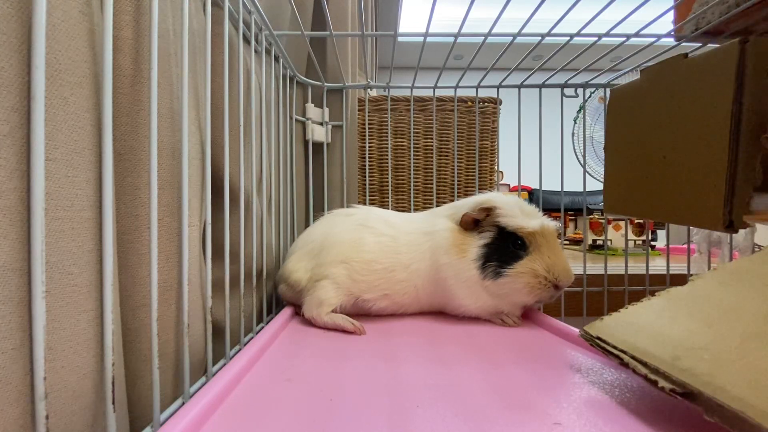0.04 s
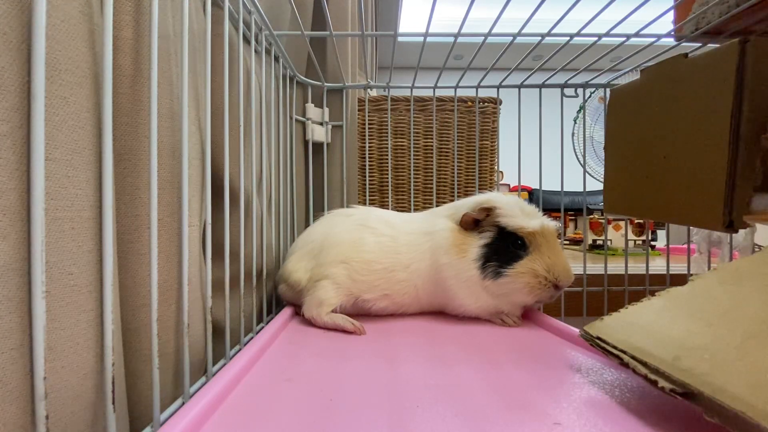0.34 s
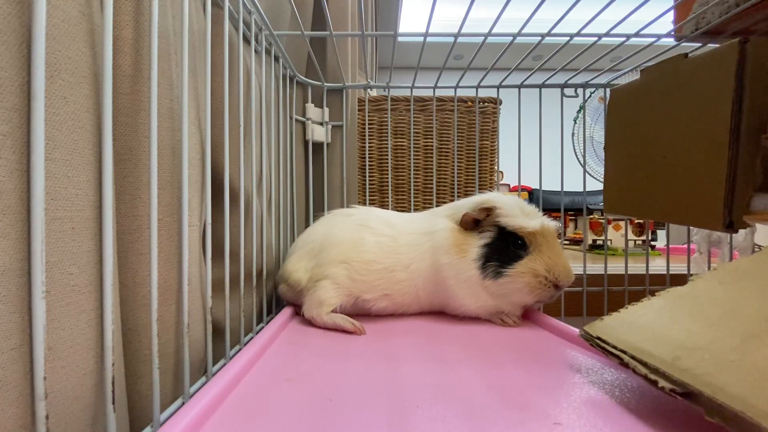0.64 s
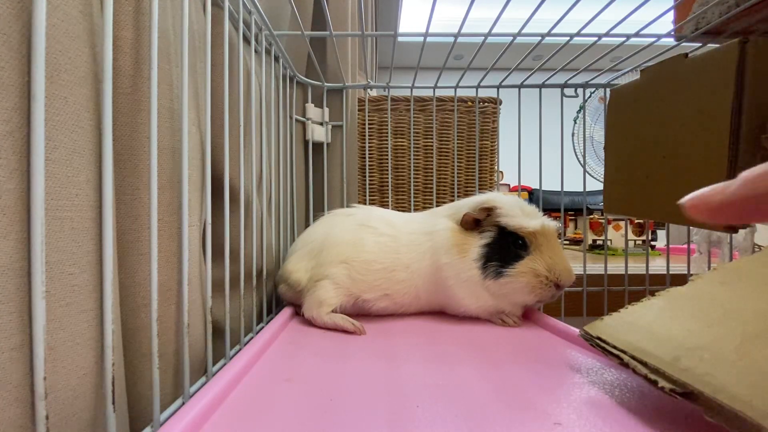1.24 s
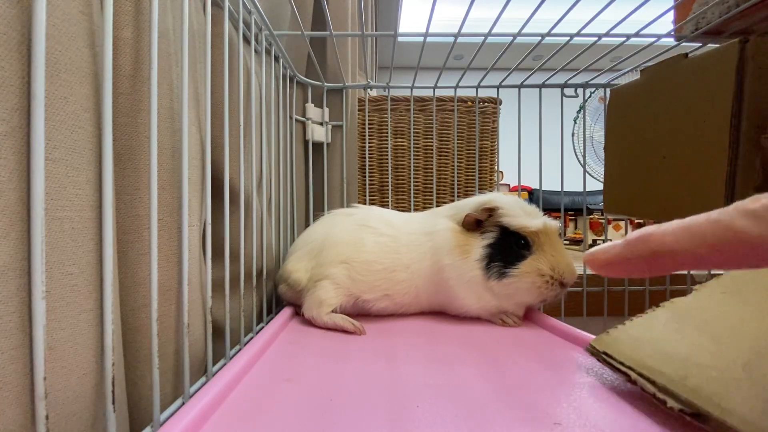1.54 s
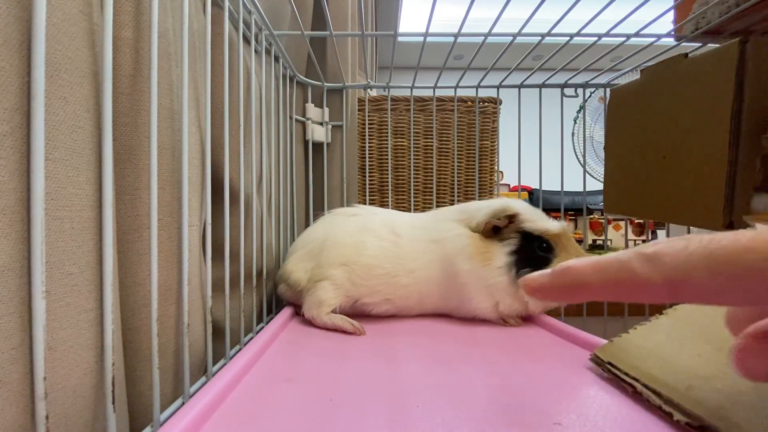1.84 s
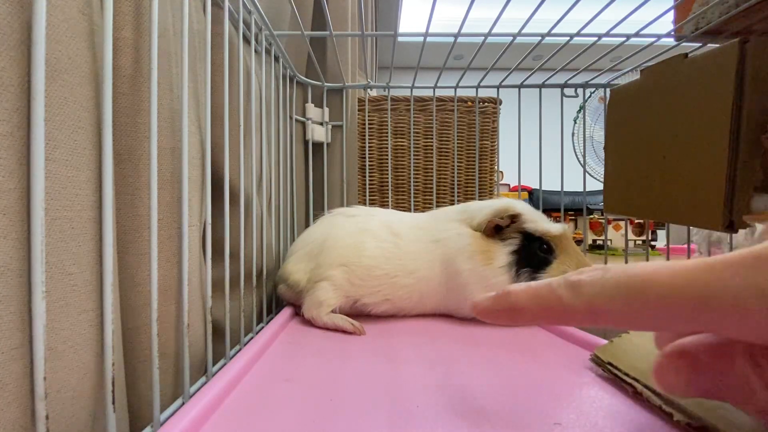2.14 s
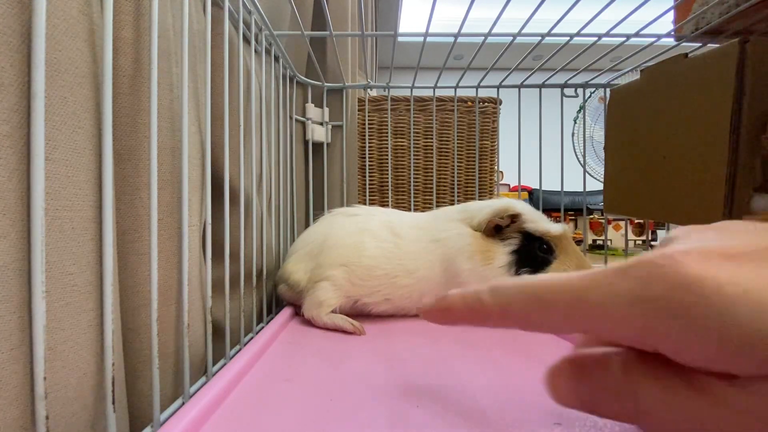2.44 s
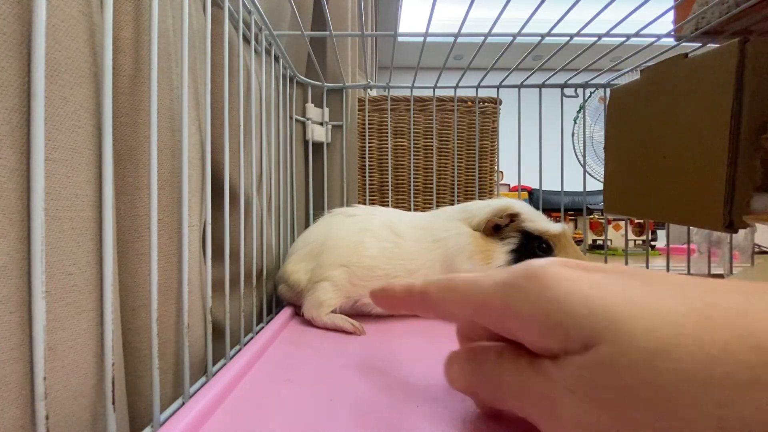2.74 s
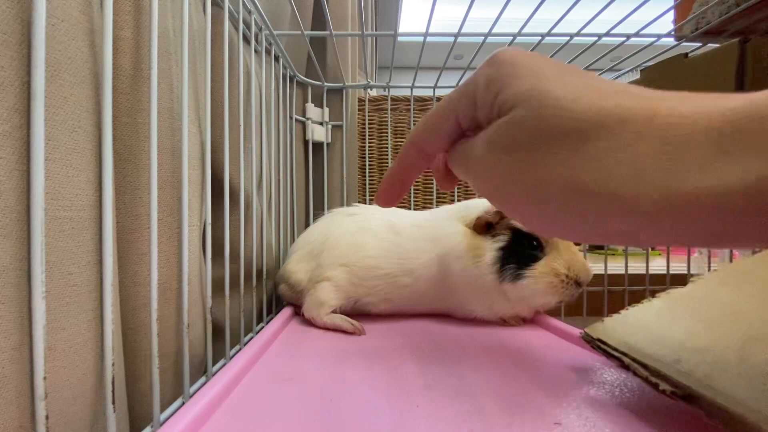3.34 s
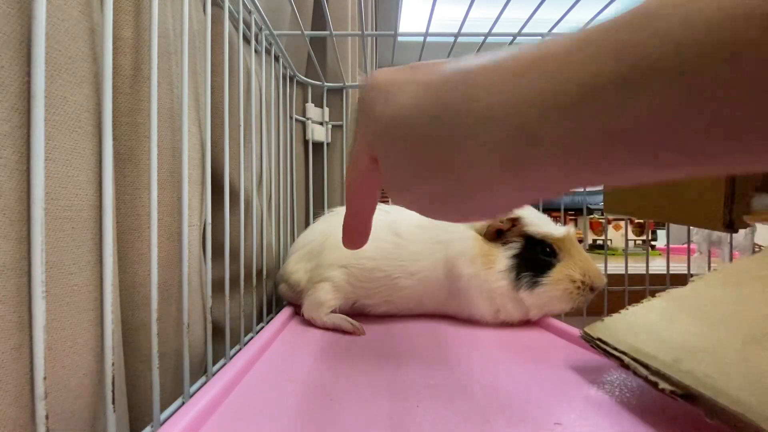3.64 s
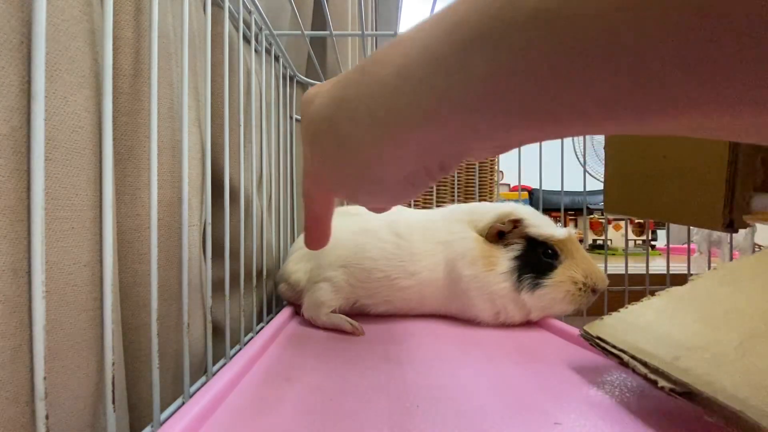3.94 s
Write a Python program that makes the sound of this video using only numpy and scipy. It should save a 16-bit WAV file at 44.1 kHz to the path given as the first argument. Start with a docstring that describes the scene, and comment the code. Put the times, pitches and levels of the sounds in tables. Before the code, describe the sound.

A guinea pig gives short, low chuts, often paired, growing louder over the first two seconds. Fur rustles under a finger from about 1.7 to 3 seconds. A wavering whine runs from 2 to 2.5 seconds, then the plastic tray thumps softly near 2.7, with a brief scratch near 2.9. High squeaks mix with more chuts until a hoarse protest at 3.8 seconds. A low room hum continues underneath.

```python
"""Short, low grumbles that flick upward: a guinea pig "chuts" in its wire cage.
As a finger strokes it, it whines, squeaks and ends on a hoarse protest. One voice makes every call:
a note and its overtones pass through a fixed throat, turning rough where the voice catches or breaks.
Fur rustles under the finger, the plastic tray is bumped, and a low hum fills the small room."""
import sys
import numpy as np
from scipy import signal
from scipy.fft import rfft, irfft
from scipy.io import wavfile
from scipy.ndimage import uniform_filter1d, map_coordinates

SR = 44100
rng = np.random.default_rng(int(sys.argv[2]) if len(sys.argv) > 2 else 0)


def unload_wav(signal):
    """Save mono or channel-first audio to the path in sys.argv[1] as 16-bit WAV at rate SR, clipped to [-1, 1]."""
    wavfile.write(
        sys.argv[1],
        SR,
        np.round(np.clip(np.atleast_2d(signal).T, -1, 1) * 32767).astype(np.int16),
    )


N = 176400
T = np.arange(N) / SR
FREQS = np.fft.rfftfreq(N, 1 / SR)
TOP_HZ = 15900


# One chut a row: start t/s, body length/s, first f/Hz, held f/Hz, last f/Hz, level/dB,
# roughness (0 clear, about 1 all rasp), flick length/s, flick f/Hz, flick level/dB
CHUT_CALLS = [(0.214, 0.046, 678, 699, 730, -47.5, 0.37, 0.0055, 730, -65),
              (0.315, 0.04, 598, 653, 769, -48.5, 0.29, 0.014, 824, -57.5),
              (0.643, 0.05, 611, 763, 741, -47.5, 0, 0.0067, 750, -66),
              (0.934, 0.049, 609, 724, 707, -45.5, 0.5, 0.025, 915, -41.5),
              (1.044, 0.045, 604, 723, 691, -45.5, 0.25, 0.025, 1043, -40),
              (1.284, 0.055, 583, 746, 621, -45, 0.39, 0.029, 986, -38),
              (1.392, 0.059, 600, 769, 682, -44.5, 0.63, 0.019, 1147, -38.5),
              (1.607, 0.055, 637, 716, 641, -42.5, 0.56, 0.019, 1367, -38),
              (1.704, 0.052, 678, 728, 860, -42.5, 1.04, 0.0175, 1590, -45.5),
              (1.903, 0.067, 679, 690, 581.6, -43, 0.65, 0.023, 2970, -46),
              (2.658, 0.075, 723, 672.4, 709, -42.5, 0.55, 0.033, 3100, -44),
              (3.169, 0.077, 715.4, 682.4, 706, -39, 0.56, 0.033, 2850, -45.5),
              (3.596, 0.075, 677.4, 705, 680, -37.5, 0.37, 0.029, 2970, -49)]

def chuts():
    """Each chut catches roughly, holds a clearer low note, breaks, and flicks upward."""
    hold_from, hold_to, flick_rise = .42, .755, .49  # shares of the body and of the flick
    calls = []
    for start, length, first_hz, held_hz, last_hz, db, rough, flick_s, flick_hz, flick_db in CHUT_CALLS:
        end = start + length
        rise_s = flick_s * flick_rise
        leap = max(np.log2(flick_hz / last_hz) - 1, 0)
        break_db = min(db, flick_db) - 7 * leap  # the voice drops out on leaps wider than an octave
        points = [(start, first_hz, db - 4.5, rough),
                  (start + length * hold_from / 2, first_hz, db, rough ** 2),
                  (start + length * hold_from, held_hz, db, .35 * rough),
                  (start + length * hold_to, (held_hz + last_hz) / 2, db, .35 * rough),
                  (start + length * (1 + hold_to) / 2, last_hz, db, rough),
                  (end, last_hz, db + 1.5, min(1.67 * rough, 1)),
                  (end + rise_s / 2, np.sqrt(last_hz * flick_hz), break_db, min(rough / 2 + leap, 1)),
                  (end + rise_s, flick_hz, flick_db, .18 + leap / 2),
                  (end + flick_s, flick_hz, flick_db, .18)]
        base_db = .65 * (-36.5 - db)  # louder chuts are pressed, which weakens the base note
        calls.append((points, base_db))
    return calls


# The path of each whine, one list each: t/s, f/Hz, level/dB
WHINE_PATHS = [
    [(2.025, 2056, -51), (2.036, 1247, -40.5), (2.058, 1291, -41.5), (2.1, 2003, -46), (2.137, 1817, -48),
     (2.206, 1894, -44), (2.24, 1644, -40), (2.254, 1815, -48), (2.286, 1912, -43), (2.3, 1673, -45.5),
     (2.368, 1974, -44.5), (2.412, 1900, -46), (2.422, 1640, -41.5), (2.455, 2200, -60.5),
     (2.482, 1882, -42), (2.52, 2650, -67)],
    [(2.8, 3060, -43), (2.82, 2716, -45.5), (2.892, 2696, -51)],
    [(2.907, 1615, -41), (2.922, 1302, -39.5), (2.936, 1654, -41), (2.982, 2010, -46), (2.994, 2604, -48.5),
     (3.036, 2953, -39), (3.059, 2910, -41)],
    [(3.279, 3134, -55), (3.294, 4065, -51), (3.308, 3190, -49.5), (3.341, 2960, -42), (3.359, 4200, -61),
     (3.371, 3030, -45), (3.412, 3310, -72)],
    [(3.479, 2770, -54), (3.488, 2640, -38.5), (3.506, 1420, -51)],
    [(3.704, 2974, -44), (3.725, 4820, -58), (3.763, 4760, -63.5)],
]
# How rough a whine is at each pitch: f/Hz, roughness (0 to 1)
WHINE_ROUGHNESS = [(1300, .13), (1800, .06), (2850, .09), (3200, .4)]

def whines():
    """Clearer, higher calls that slide up and down."""
    return [([(s, hz, db, at_hz(WHINE_ROUGHNESS, hz)) for s, hz, db in path], 0) for path in WHINE_PATHS]


# The path of the last call: t/s, f/Hz, level/dB, roughness (0 to 1)
PROTEST_PATH = [(3.812, 1770, -38, 0.3), (3.821, 1482, -35.5, 0), (3.828, 1040, -34.5, 0.46),
                (3.842, 1323, -34.5, 0.06), (3.86, 1164, -39, .6), (3.876, 1471, -35.5, 0.15),
                (3.893, 1420, -42, 0.55), (3.906, 2774, -37.5, 0.11), (3.922, 1378, -41, 0.76),
                (3.938, 1265, -34, 0.04), (3.947, 1484, -43.5, 0.97), (3.969, 1203, -40.5, 0.46),
                (3.979, 2576, -37.5, 0.26), (3.988, 1967, -41.5, 0.4), (4.005, 2322, -34, 0.01)]

def protest():
    """One hoarse call that jumps about in pitch."""
    return [(PROTEST_PATH, 0)]


# How the throat boosts or softens each frequency: f/Hz, level/dB
THROAT_SHAPE = [(600, 0.5), (720, -2), (1000, 12), (1370, 7.5), (1600, -12.5), (2100, -8), (2850, -7.5),
                (3450, -22), (4200, -46), (4900, -50), (7000, -37), (8300, -68.5), (10000, -50),
                (14000, -67)]
# Overtone strength at each pitch, weakest where the voice whistles: f/Hz, level/dB
OVERTONE_STRENGTH = [(780, 3), (1300, 9.5), (1900, -13), (3000, 4.5)]
# The tone of the hiss in the voice: f/Hz, level/dB
BREATH_SHAPE = [(1200, 8.5), (3900, -1.5), (4900, -13.5), (6500, 4.5), (11000, -19), (14000, -58)]

def voice(calls):
    """Sing through the throat. A call is its (t/s, f/Hz, level/dB, roughness) points and base note/dB."""
    out = np.zeros(N)
    shake, jitter, quiver = wander(380), wander(380), wander(53.3)
    breath = amp(-35) * colour(rng.standard_normal(N), BREATH_SHAPE)
    throat_noise = colour(rng.standard_normal(N), THROAT_SHAPE)
    cut_lows = signal.butter(4, 600, "high", fs=SR, output="sos")
    rasp = unit(signal.sosfilt(cut_lows, np.gradient(throat_noise)))
    k = np.arange(1, 17)[:, None]  # 1 is the base note, the rest are its overtones
    attack_s, release_s = .00089, .0038
    for points, base_db in calls:
        times, *controls = np.array(points).T
        on = (T >= times[0]) & (T < times[-1])
        t = T[on]
        hz, db, rough = (uniform_filter1d(np.interp(t, times, c), 160, mode="nearest") for c in controls)
        wobbly_hz = hz * (1 + .01754 * quiver[on] + .1 * rough * jitter[on])
        phase = 2 * np.pi * np.cumsum(wobbly_hz) / SR
        bright_db = 3.5 * times[0]  # later calls are brighter as the animal gets annoyed
        throat_db = at_hz(THROAT_SHAPE, k * hz) + bright_db * (k * hz > 3585)
        source_db = np.where(k == 1, base_db, at_hz(OVERTONE_STRENGTH, hz))
        gains = amp(throat_db + source_db) * (k * hz < TOP_HZ)
        tone = np.sum(gains * np.sin(k * phase + k ** 2), axis=0)
        tone /= np.sqrt(np.sum(gains ** 2, axis=0) / 2)
        # Roughness shakes the level, makes every second cycle weaker and turns low notes into rasp.
        flutter = .6 * (shake[on] + np.cos(phase / 2))
        rasp_mix = np.clip(rough, 0, 1) ** 1.8 * np.minimum(2000 / hz, 1) ** 2
        tone_mix = np.sqrt((1 - rasp_mix ** 2) / (1 + rough ** 2 / 2))
        tone = tone_mix * tone * (1 + rough * flutter) + rasp_mix * rasp[on]
        hiss = breath[on] * amp(bright_db) * (1 + 2 * rough)
        fade = np.clip(np.minimum((t - times[0]) / attack_s, (times[-1] - t) / release_s), 0, 1)
        out[on] += amp(db) * np.sin(fade * np.pi / 2) ** 2 * (tone + hiss)
    return out


# Which side the voice leans to: t/s, left minus right level/dB
VOICE_SIDE = [(1.4, -1), (2.0, 1), (3.2, -2.5)]

def in_cage(sound):
    """The voice reaches the right side first; it bounces off the tray and the room adds a faint tail."""
    t, decay_s = T[:SR // 3], .07
    tail = rng.standard_normal((2, len(t))) * np.exp(-t / decay_s) * np.sqrt(2 / (decay_s * SR))
    direct = np.array([delay(sound, seconds=.00009), sound])
    tray_echo = amp(-11) * np.array([delay(sound, seconds=.000788), delay(sound, seconds=.00147)])
    room_echo = amp(-18.5) * signal.fftconvolve(sound[None], tail, axes=1)[:, :N]
    return (direct + tray_echo) * pan(over_time(VOICE_SIDE)) + room_echo


# How loud the stroking is: t/s, level/dB
STROKE_LEVEL = [(1.38, -95), (1.42, -69.5), (1.63, -80), (1.68, -50), (1.85, -48.5), (1.91, -58.5),
                (2.42, -59.5), (2.59, -44), (2.87, -55.5), (2.93, -47.5), (2.97, -50), (3.07, -51.5),
                (3.083, -73), (4, -71.5)]
# The tone of the rustle: f/Hz, level/dB
FUR_SHAPE = [(260, -1), (450, -13), (950, -3), (1500, -15.5), (2550, -13.5), (4500, -8), (6600, -11),
             (8700, -8.5), (12000, -12), (16100, -24)]

def fur():
    """Hairs slip under the finger in a dense, grainy hiss."""
    rubbing = shifting_resonances(noise_pair(likeness=.068))
    grain_db = wander(885) + 1.93 * wander(17)
    hairs = colour(rubbing * amp(grain_db), FUR_SHAPE)
    return pan(-1.5) * hairs * amp(over_time(STROKE_LEVEL))


def shifting_resonances(noise, depth_db=2.8, width_hz=500, span_s=.08):
    """Narrow bands of the rubbing noise swell and fade at random."""
    f, t, spectrum = signal.stft(noise, SR, nperseg=512)
    swell = rng.standard_normal(spectrum.shape[-2:])
    for _ in range(2):
        swell = uniform_filter1d(swell, round(width_hz / f[1]), axis=0)
        swell = uniform_filter1d(swell, round(span_s / t[1]), axis=1)
    return signal.istft(spectrum * amp(depth_db * unit(swell)), SR)[1][:, :N]


# Small scratches: t/s, level/dB, fade time/s
SCRATCHES = [(1.847, -52, 0.0032), (2.927, -39.5, 0.012), (3.468, -58.5, 0.024)]
# The tone of a scratch: f/Hz, level/dB
SCRATCH_SHAPE = [(1500, -15), (12000, -15.5)]

def scratches():
    """Claw and nail make sharp bursts of noise that die away fast."""
    bursts = sum(amp(db) * (T >= s) * np.exp(-np.abs(T - s) / decay) for s, db, decay in SCRATCHES)
    return pan(-1.5) * bursts * colour(noise_pair(likeness=.068), SCRATCH_SHAPE)


# Bumps on the tray: t/s, level/dB
TRAY_BUMPS = [(2.668, -17), (2.946, -31)]
# The notes the tray rings with: f/Hz, level/dB added to the bump's, fade time/s
TRAY_NOTES = [(91.7, -17, 0.056), (152, 12, 0.0048), (191, -1, 0.0072)]

def tray(rise_s=.012):
    """Soft bumps make the plastic tray ring low and briefly."""
    out = np.zeros(N)
    for start, bump_db in TRAY_BUMPS:
        t = np.maximum(T - start, 0)
        ring = sum(amp(db) * np.exp(-t / decay) * np.cos(2 * np.pi * hz * t)
                   for hz, db, decay in TRAY_NOTES)
        out -= amp(bump_db) * (1 - np.exp(-t / rise_s)) * ring
    return out * pan(3.5)


# The tone of the room's rumble: f/Hz, level/dB
RUMBLE_SHAPE = [(21, -72), (36, -30), (52, -5), (75, -12), (98, -9.5), (135, -7.5), (172, -24.5),
                (295, -18.5), (385, -33), (12400, -74), (16100, -109)]
# Which side the rumble leans to: f/Hz, left minus right level/dB
RUMBLE_SIDE = [(70, -6.5), (1000, 1.5)]

def room():
    """A steady low rumble with a wavering hum."""
    rumble = colour(noise_pair(likeness=.82), RUMBLE_SHAPE)
    rumble = irfft(rfft(rumble) * pan(at_hz(RUMBLE_SIDE, FREQS)), N)
    hum = pan(-8.5) * wander(7, centre_hz=73.5)
    return amp(-50) * rumble + amp(-50.5) * hum


def amp(db):
    """Turn decibels into a number to multiply by."""
    return 10 ** (np.asarray(db) / 20)


def unit(x):
    """Scale to an average strength (rms) of 1."""
    return x / np.sqrt(np.mean(x ** 2))


def at_hz(table, hz):
    """Look up a frequency in a table, with octaves evenly spaced."""
    f, value = np.array(table, float).T
    return np.interp(np.log(np.maximum(hz, 1)), np.log(f), value)


def over_time(table):
    """Join a table's points in time with straight lines."""
    return np.interp(T, *np.array(table).T)


def colour(x, table):
    """Shape a sound's tone with an f/Hz, level/dB table, then scale it to strength 1."""
    return unit(irfft(rfft(x) * amp(at_hz(table, FREQS)), N))


def wander(hz, centre_hz=0):
    """A random wobble of strength 1, mostly within hz of the centre."""
    return unit(irfft(rfft(rng.standard_normal(N)) / (1 + ((FREQS - centre_hz) / hz) ** 4), N))


def pan(db):
    """Left and right gains that put the left db above the right."""
    return amp(np.array([[.5], [-.5]]) * db)


def delay(x, seconds):
    """The same sound, a little later."""
    return map_coordinates(x, [(T - seconds) * SR])


def noise_pair(likeness):
    """Left and right noise, from unrelated (0) to the same (1)."""
    mid, side = rng.standard_normal((2, N))
    return np.sqrt(1 + likeness) * mid + np.sqrt(1 - likeness) * side * np.array([[1], [-1]])


def scene():
    """The guinea pig, the stroking, the tray and the room together."""
    guinea_pig = voice(chuts() + whines() + protest())
    return in_cage(guinea_pig) + fur() + scratches() + tray() + room()


def record(dry):
    """Cut away the very highest treble."""
    return signal.sosfilt(signal.ellip(10, .2, 80, TOP_HZ, fs=SR, output="sos"), dry)


dry = scene()
out = record(dry)
unload_wav(out)
```